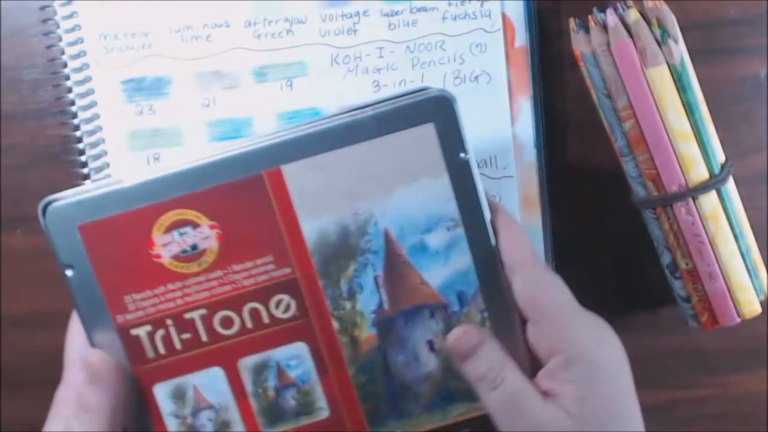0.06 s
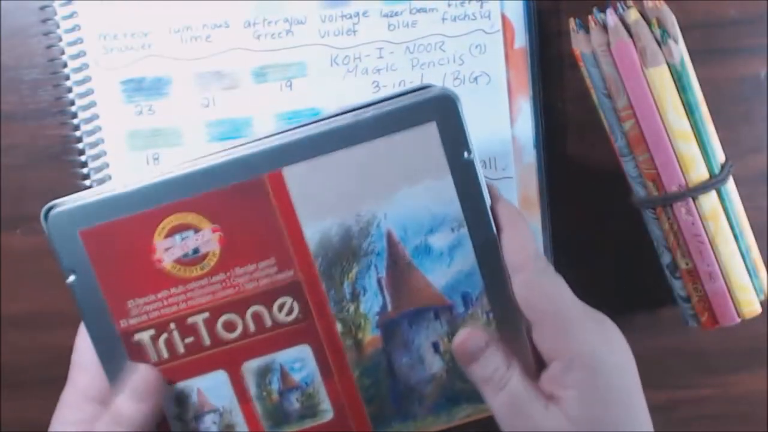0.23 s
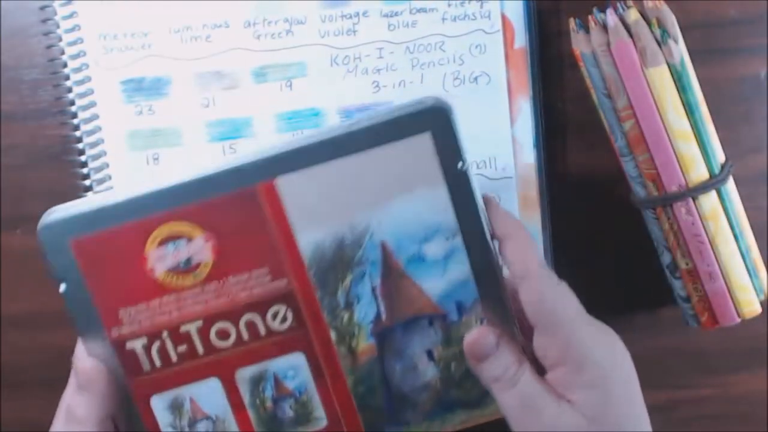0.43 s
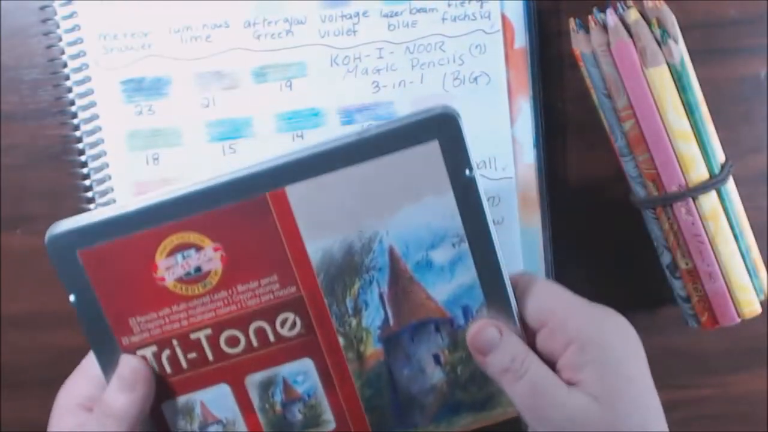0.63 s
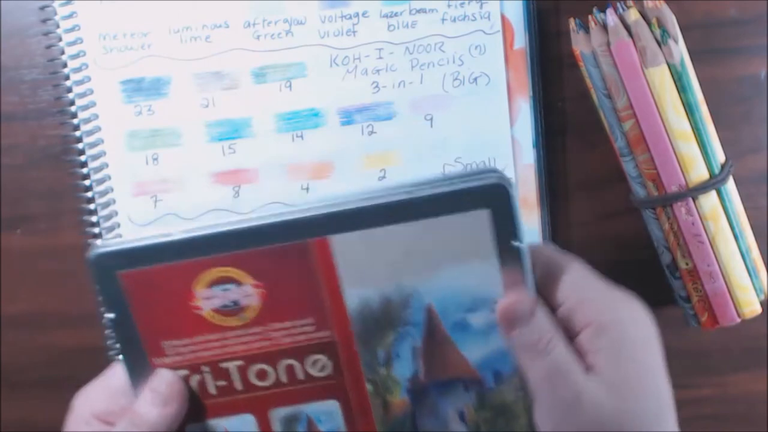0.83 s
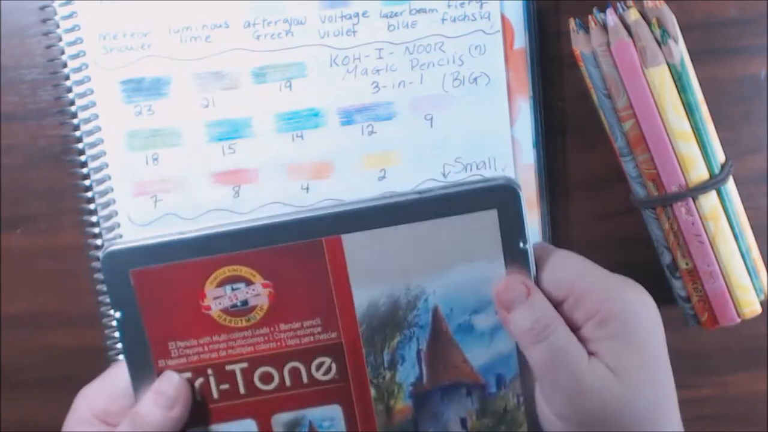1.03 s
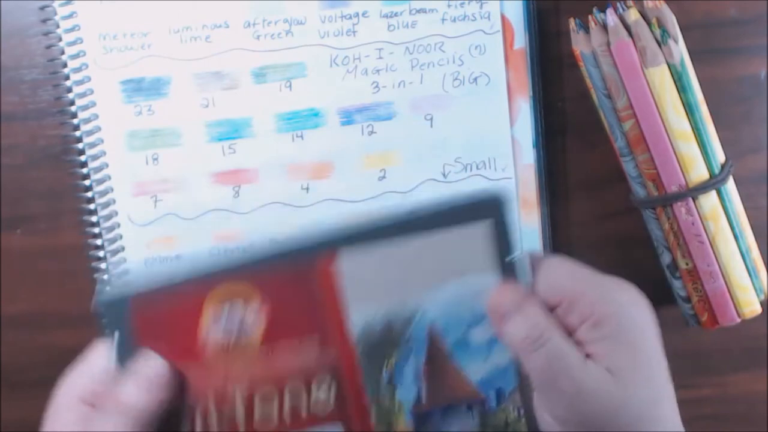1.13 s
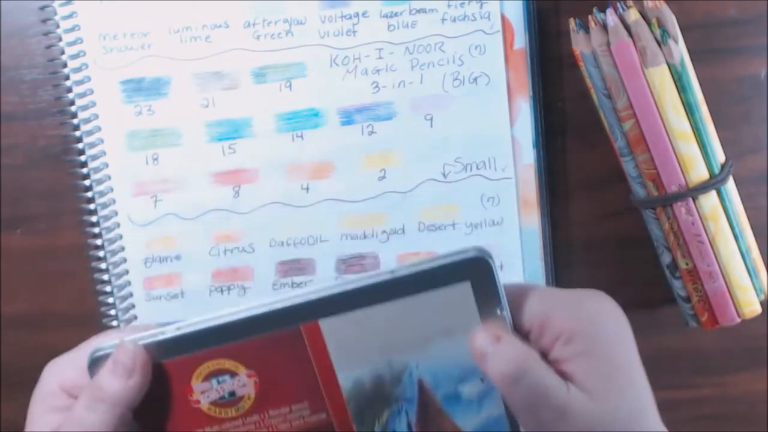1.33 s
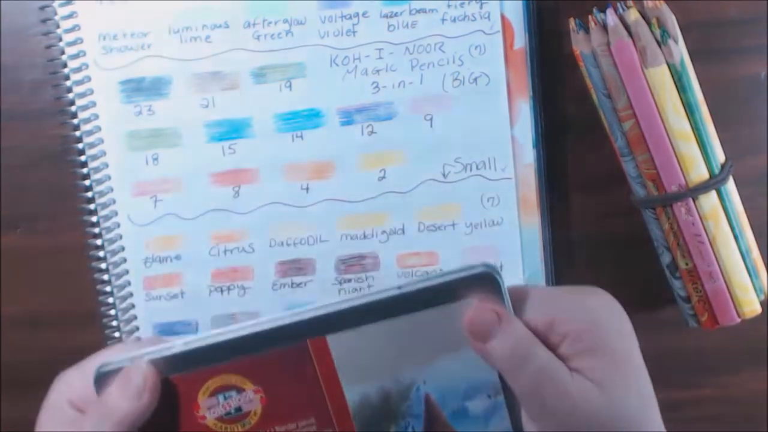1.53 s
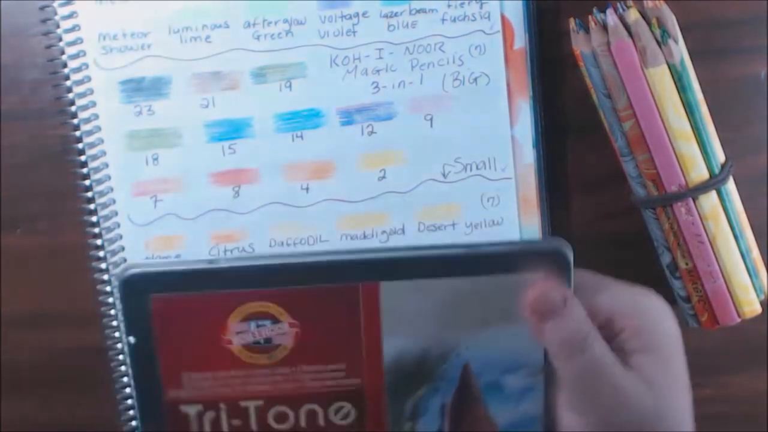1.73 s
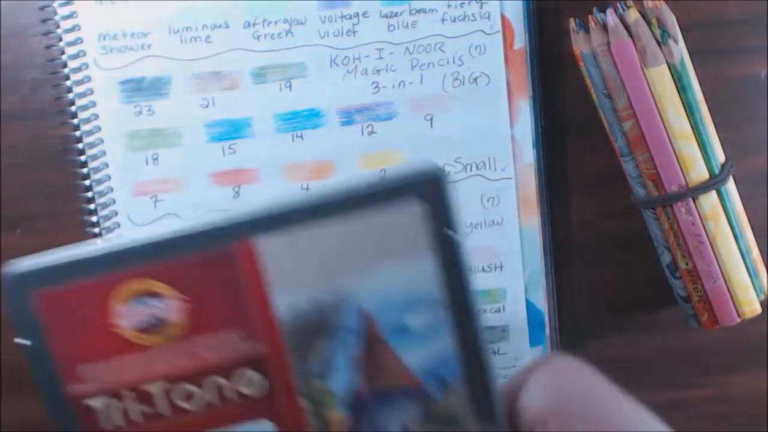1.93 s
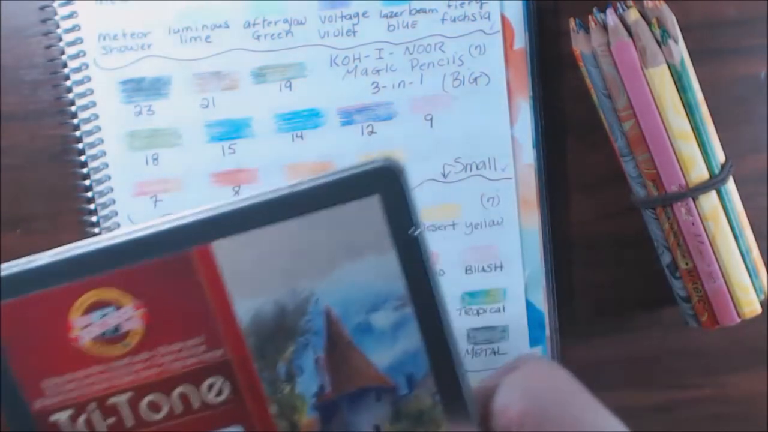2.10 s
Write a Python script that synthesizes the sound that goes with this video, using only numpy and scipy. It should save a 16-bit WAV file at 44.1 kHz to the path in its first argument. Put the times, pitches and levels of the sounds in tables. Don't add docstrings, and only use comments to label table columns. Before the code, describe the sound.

Pencils slide and knock in a flat metal tin tilted by hand: a light rattle, harder clacks, a lid-like thud midway, then softer muffled rattles. Close, slightly dull microphone in a small quiet room with faint hum.

```python
import sys
import numpy as np
from scipy import signal
from scipy.fft import rfft, irfft
from scipy.io import wavfile
from scipy.ndimage import uniform_filter1d

SR = 44100
rng = np.random.default_rng(int(sys.argv[2]) if len(sys.argv) > 2 else 0)


def volts_from_decibels(level):
    exponent = np.asarray(level, float) / 20
    return 10 ** exponent


def bounce(signal):
    frames = np.transpose(np.atleast_2d(signal))
    limited = np.clip(frames, -1, 1)
    pcm = np.round(limited * 32767).astype(np.int16)
    wavfile.write(sys.argv[1], SR, pcm)


N = 95476

# (frequency [Hz], level difference [dB])
LEAN = [(100, 0), (250, 5.5), (600, 4.5), (1200, .5), (7500, 0)]


def at_hz(points, hz):
    p = np.array(points, float)
    return np.interp(np.log(hz), np.log(np.maximum(p[:, 0], 1)), p[:, 1])


def ring(clicks, hz, t60):
    r, w = volts_from_decibels(-60 / (t60 * SR)), 2 * np.pi * hz / SR
    return signal.lfilter([0, np.sin(w)], [1, -2 * r * np.cos(w), r * r], clicks + 1e-18)


def soften(x, hz, t60):
    r, w = volts_from_decibels(-60 / (max(t60, .001) * SR)), 2 * np.pi * hz / SR
    return signal.lfilter(np.array([1, 0, -1]) * (1 - r * r) / 2, [1, -2 * r * np.cos(w), r * r], x)


def room_floor():
    # (frequency [Hz], level [dB rms])
    hum = [(118.4, -66), (242.2, -74)]
    # (frequency [Hz], density [dB per Hz])
    hiss_colour = [(30, -16), (75, -8), (120, -0.5), (200, -13), (390, -2.5), (600, -9.5), (2100, -16.5),
                   (8000, -37)]
    hiss_db, side_db = -68, -10.5
    t = np.arange(N) / SR
    hz = np.maximum(np.arange(N // 2 + 1) * SR / N, 10)
    noise = rng.standard_normal((2, N))
    mid, side = irfft(rfft(noise) * volts_from_decibels(at_hz(hiss_colour, hz)), N)
    out = volts_from_decibels(hiss_db) * (mid + volts_from_decibels(side_db) * side * [[1], [-1]]) / mid.std()
    wavers = uniform_filter1d(rng.standard_normal((3, N)), size=900) * 18.0
    for (f, db), waver in zip(hum, wavers):
        out += np.sqrt(2) * volts_from_decibels(db) * (1 + waver) * np.sin(2 * np.pi * f * t)
    return out


def slide_levels():
    # (time [s], slide [dB], tray share [dB], lid share [dB])
    open_tilts = [
        [(.05, -72.5, 1, 7), (.075, -51.5, -28, -20), (.1, -43, -15, -1), (.17, -45.5, -18, -1),
         (.225, -45.5, -28, -3), (.255, -54, -19.5, -31), (.31, -67, 3.5, -7.5)],
        [(.445, -79.5, 19, 8.5), (.466, -39.5, -30, -18.5), (.488, -26.5, 7, 3), (.56, -45.5, -11.5, 3),
         (.6, -45.5, -9, 0.5), (.67, -45.5, 4, -2), (.72, -38.5, -8, -1), (.78, -74.5, -24, -3.5)],
        [(.825, -70, -5.5, 18), (.86, -38.5, 6.5, 0), (.885, -35.5, -0.5, -2.5), (.95, -33.5, -6.5, 3.5),
         (.995, -68.5, -19, -11), (1.015, -61, -10, -8), (1.03, -53.5, -30, 10)],
    ]
    # (time [s], slide [dB], tray share [dB], lid share [dB])
    shut_tilts = [
        [(1.05, -57, -5, -13), (1.07, -32, -3.5, 6.5), (1.112, -23, -5, 2), (1.18, -47, -3, -2),
         (1.22, -67, -10, -19.5)],
        [(1.3, -66, -9, 6), (1.345, -40, 8.5, 0), (1.385, -46, 1.5, 7.5), (1.435, -34.5, -1.5, 14.5),
         (1.485, -45.5, -2.5, 5), (1.55, -81.5, -30, 19.5)],
        [(1.64, -65, -26.5, 12.5), (1.66, -55, -17, 4.5), (1.7, -50.5, 6, 9.5), (1.715, -68, -1.5, 10),
         (1.745, -82.5, -12.5, 8)],
        [(1.755, -79, -9, 36.5), (1.8, -51.5, -9.5, 6), (1.87, -45.5, -2, 6.5), (1.94, -44, 3, 1.5),
         (2.03, -45, 0.5, 11), (2.095, -45.5, -10.5, 2.5), (2.135, -93, -8, 5.5)],
    ]
    slide_trim_db, tick_db = -1.5, -0.5
    tick_follows = 1.196
    t, rows = np.arange(N) / SR, np.full((3, N), -120.)
    for table in list(open_tilts) + list(shut_tilts):
        s, *columns = np.transpose(table)
        inside = (t >= s[0]) & (t <= s[-1])
        rows[:, inside] = [np.interp(t[inside], s, c) for c in columns]
    slide = rows[0] + slide_trim_db
    return np.array([slide + rows[1], slide + rows[2], slide, tick_follows * slide + tick_db])


def slide_grains():
    contacts_per_s, spread_db = 2500, 2.6
    contacts = rng.random(N) < contacts_per_s / SR
    grains = contacts * volts_from_decibels(spread_db * np.minimum(rng.exponential(1, N), 4))
    return grains / np.sqrt(np.mean(grains ** 2))


def knock_levels():
    # (time [s], wood peak [dB], tray [dB], lid [dB], tick [dB])
    early_knocks = [(.0894, -23, -73, -51, -39), (.1086, -25, -29.5, -45, -36.5),
                    (.1361, -20.5, -73, -28, -35), (.1829, -20.5, -29, -30, -32),
                    (.2109, -27.5, -31.5, -41, -62), (.2638, -20.5, -29, -23, -29),
                    (.4828, -21, -30, -40, -26), (.4918, 3.5, -20.5, -2.5, -19.5),
                    (.5007, -3, -19.5, -8.5, -21.5), (.5788, -30.5, -59, -56, -38.5),
                    (.6058, -21.5, -28, -30, -25), (.621, -11.5, -14, -16.5, -23),
                    (.6855, -13.5, -4.5, -4.5, -23), (.6902, -12.5, -12, -17, -26.5),
                    (.8395, -19.5, -7.5, -22, -23.5), (.8504, -24.5, -17, -30.5, -40.5),
                    (.89, -6, -11.5, -17, -17.5), (1.0758, -10, 7.5, 3, -17), (1.089, 3.5, 6, 1, -8)]
    # (time [s], wood peak [dB], tray [dB], lid [dB], tick [dB])
    late_knocks = [(1.0056, -33.5, -65.5, -37, -70), (1.033, -37.5, -51, -39.5, -62),
                   (1.0374, -28, -56.5, -33, -46), (1.2244, -54.5, -70.5, -40, -66.5),
                   (1.3259, -24.5, -13.5, -20.5, -41), (1.3394, -19.5, -36, -21.5, -39),
                   (1.3639, -51.5, -38.5, -18, -40.5), (1.4052, -21.5, -13.5, -13, -38.5),
                   (1.4164, -18.5, -57.5, -8.5, -31), (1.4272, -8, -46, -7, -22.5),
                   (1.4514, -20, -21.5, -32.5, -37.5), (1.6574, -32, -83, -25, -60),
                   (1.7684, -43, -81, -49, -79.5), (1.7828, -33, -38, -22.5, -50.5),
                   (1.8193, -16, -78, -14, -30), (1.8424, -41.5, -52, -19.5, -35.5),
                   (1.8891, -29, -16.5, -16.5, -38), (1.8964, -24.5, -14, -16, -34),
                   (1.9131, -20, -13, -13, -30), (1.9869, -18.5, -42, -37, -50.5),
                   (2.0078, -19.5, -37, -15, -41), (2.0522, -41, -69, -28.5, -46),
                   (2.0667, -26, -78.5, -15.5, -54), (2.0857, -32, -61, -36, -62.5)]
    # (time [s], wood peak [dB], tray [dB], lid [dB], tick [dB])
    small_knocks = [(.2251, -28.5, -44, -53, -51), (.465, -27, -71, -56, -58),
                    (.4713, -22, -63, -45.5, -51), (.5077, -14.5, -36, -23, -36),
                    (.516, -14, -18, -26, -40), (.6396, -28, -29.5, -43, -38.5),
                    (.7054, -21.5, -32.5, -25, -38.5), (.717, -35.5, -39, -26, -41.5),
                    (1.0653, -32, -45, -30, -40), (1.0958, -11, -26, -24, -22.5),
                    (1.1022, -14, -14, -20, -27.5), (1.3459, -35, -29, -35, -42),
                    (1.3744, -42.5, -36.5, -33, -46), (1.4361, -26, -33.5, -17, -47),
                    (1.4432, -33.5, -36, -34.5, -47), (1.6888, -43, -49.5, -44, -58),
                    (1.8277, -34, -47, -23.5, -42), (1.8494, -33, -49.5, -38, -54.5),
                    (1.9214, -27, -50, -17.5, -40), (1.9711, -29, -45, -43, -46),
                    (2.0168, -21, -38, -21, -41), (2.0395, -30, -48, -44, -52),
                    (2.077, -32, -48.5, -22, -45)]
    # time [s], wood, tray, lid, tick [dB]
    small_trim = [0, 0, 8, 6, 3]
    # tray, lid, wood, tick [dB]
    zone_trim = [-12.5, -6, -6.5, -0.5]
    small = np.add(small_knocks, small_trim)
    s, wood, tray, lid, tick = np.transpose(list(early_knocks) + list(late_knocks) + list(small))
    return s, np.array([tray, lid, wood, tick]) + np.array(zone_trim)[:, None]


def zone_mix(zone_db, hz):
    zone_edges = [850, 1030, 1300, 1500, 2650, 3500]
    k = np.interp(np.log(hz), np.log(zone_edges), [0, 1, 1, 2, 2, 3])
    low = min(int(k), 2)
    return zone_db[low] + (k - low) * (zone_db[low + 1] - zone_db[low])


def tin(count=110, size=4):
    # (frequency [Hz], level [dB])
    body = [(220, -22), (360, -5.5), (700, -0.5), (930, -3.5), (1180, -2.5), (1500, -3), (5500, -5),
            (7800, -11)]
    # (frequency [Hz], t60 [s])
    damping = [(500, 0.072), (1170, 0.042), (2200, 0.026), (7000, 0.018)]
    # (frequency [Hz], swell t60 [s])
    contact = [(500, 0.021), (1170, 0.016), (2200, 0.009), (7000, 0.00083)]
    # (frequency [Hz], scatter [dB])
    lean_scatter = [(700, 1.35), (2000, -0.07), (4400, 1.5), (7500, 1)]
    strong_hz = [385.7, 533, 702, 815, 1137.5, 1219.5, 1463.4, 1964.4, 2505]
    strong_db, mode_scatter_db, knock_db = 3.5, 4.5, -16
    pile_s, pile_loss_db, first_db = .004, 6, 9

    s, zones = knock_levels()
    order = np.arange(size)
    late = rng.uniform(0.44, 1.6, (len(s), size)) * order * pile_s
    at = ((s[:, None] + late) * SR).astype(int)
    scatter = rng.standard_normal((len(s), count, size))
    landing_db = knock_db - pile_loss_db * order + first_db * (order == 0)

    pitches = np.linspace(200 ** .4, 7900 ** .4, count) ** 2.5
    pitches = pitches * (1 + .008 * rng.standard_normal(count))
    strong = [np.abs(pitches - hz).argmin() for hz in strong_hz]
    pitches[strong] = strong_hz
    leans = rng.standard_normal(count)

    pool, grains, slide = rng.standard_normal(N), slide_grains(), slide_levels()
    where = np.flatnonzero(grains)
    slide, out = slide[:, where], np.zeros((2, N))
    for k, hz in enumerate(pitches):
        t60, clicks = np.clip(at_hz(damping, hz), .005, .3), np.zeros(N)
        touch = pool[(where + 7919 * k) % N]
        clicks[where] = grains[where] * touch * volts_from_decibels(zone_mix(slide, hz)) / np.sqrt(t60 * SR / 4)
        sign = np.where(order > 0, np.sign(scatter[:, (k + 1) % count]), 1)
        blow_db = zone_mix(zones, hz)[:, None] + landing_db + mode_scatter_db * scatter[:, k]
        np.add.at(clicks, at, sign * volts_from_decibels(blow_db))
        lean = (at_hz(LEAN, hz) + at_hz(lean_scatter, hz) * leans[k]) / 2
        mode_db = at_hz(body, hz) + strong_db * (k in strong)
        sound = soften(ring(clicks, hz, t60), hz, at_hz(contact, hz))
        out += volts_from_decibels(mode_db + np.array([[lean], [-lean]])) * sound
    return out


def panels():
    # (time [s], peak [dB], pitch [Hz], t60 [s])
    pressed = [(0.077, -45.5, 346, 0.084), (0.135, -15.5, 1535, 0.011), (.21, -27, 730, 0.02),
               (.492, -1, 1520, 0.0099), (.494, -9, 693, 0.032), (.621, -18, 812, 0.026),
               (.684, -27.5, 303, 0.022), (.689, -7.5, 1192, 0.023), (.72, -35, 219, 0.066),
               (.89, -18, 1737, 0.022), (1.363, -13.5, 1073, 0.018), (2.067, -25.5, 2000, 0.014),
               (2.085, -21.5, 2075, 0.017), (.840, -22.5, 412.5, 0.067), (0.851, -15, 382, 0.023),
               (1.007, -36.5, 1247, 0.05), (1.033, -20, 1240, 0.039), (1.077, -5.5, 387.2, 0.066),
               (1.09, -13, 545, 0.022), (1.341, -32, 353.4, 0.1), (1.432, -42, 232, 0.054),
               (1.889, -40.5, 310, 0.053), (2.007, -29.5, 356.4, 0.067)]
    swell = 0.55
    out = np.zeros((2, N))
    for s, db, hz, t60 in pressed:
        click = np.zeros(N)
        click[int(s * SR)] = volts_from_decibels(db)
        lean = at_hz(LEAN, hz) / 2
        out += volts_from_decibels([[lean], [-lean]]) * soften(ring(click, hz, t60), hz, swell * t60)
    return out


def thud():
    shut_s, db, pitch_hz, t60_s, swell_s = 1.0865, -5, 214.4, 0.043, 0.021
    click, out = np.zeros(N), np.zeros(N)
    click[int(shut_s * SR)] = volts_from_decibels(db)
    for ratio, mode_db in [(0.98, 2), (0.81, -10.0), (1.5, -4.5), (1.1, -3.0)]:
        hz = ratio * pitch_hz
        out += volts_from_decibels(mode_db) * soften(ring(click, hz, t60_s), hz, swell_s)
    return out * volts_from_decibels([[1], [-1]])


def room(x):
    t60_s, wall_cut_hz = 0.11, 18000
    dull = np.exp(-2 * np.pi * wall_cut_hz / SR)
    lags = (rng.uniform(.006, .022, 9) * SR).astype(int)
    turn = np.exp(-2j * np.pi * np.arange(N // 2 + 1) / N)
    wall = (1 - dull) / (1 - dull * turn)
    echo = 0
    for k, lag in enumerate(lags):
        trip = volts_from_decibels(-60 * lag / SR / t60_s) * wall * turn ** lag
        echo = echo + (-1) ** k * trip / (1 - trip)
    return irfft(rfft(x, N) * echo, N)


def suppress(near):
    threshold_db, slope, window_s = -62, 0.2, 0.022
    power = uniform_filter1d(np.mean(near ** 2, 0), max(int(window_s * SR), 2))
    level = 10 * np.log10(power.clip(1e-12))
    return near * volts_from_decibels(slope * np.minimum(level - threshold_db, 0))


def scene():
    echo_db = -18.5
    floor = room_floor()
    low_cut = signal.butter(4, 360, "high", fs=SR, output="sos")
    near = signal.sosfilt(low_cut, tin()) + panels() + thud()
    near = near + volts_from_decibels(echo_db) * room(near)
    return suppress(near) + floor


def splash():
    splash_s, width_s, db = 1.091, .001, -46
    swell = np.exp(-((np.arange(N) / SR - splash_s) / width_s) ** 2)
    burst = rng.standard_normal(N) * swell * volts_from_decibels(db + np.array([[3], [-4]]))
    band = signal.cheby2(8, 50, [11700, 16100], "band", fs=SR, output="sos")
    return signal.sosfilt(band, burst)


def band_limit(x):
    return signal.sosfilt(signal.butter(12, 15900, fs=SR, output="sos"), x)


def record(dry):
    ceiling, cutoff_hz = .96, 7477
    held = dry / (1 + (dry / ceiling) ** 4) ** .25
    narrow = signal.sosfilt(signal.cheby1(10, .5, cutoff_hz, fs=SR, output="sos"), held)
    narrow = signal.sosfilt(signal.cheby2(12, 50, 8500, fs=SR, output="sos"), narrow)
    return band_limit(narrow + splash())


dry = scene()
out = record(dry)
bounce(out)
```